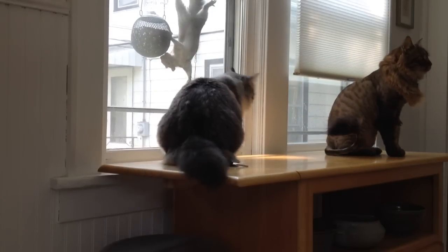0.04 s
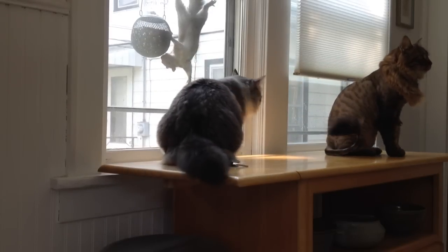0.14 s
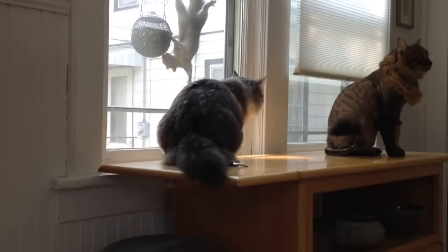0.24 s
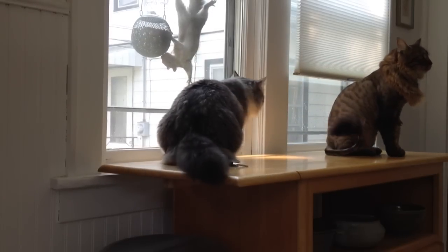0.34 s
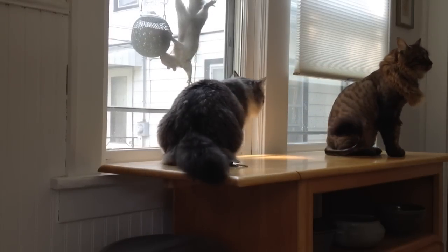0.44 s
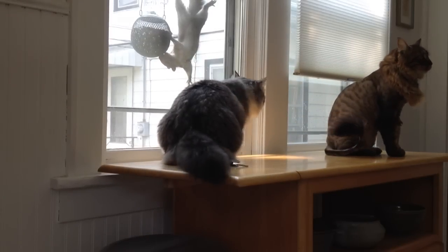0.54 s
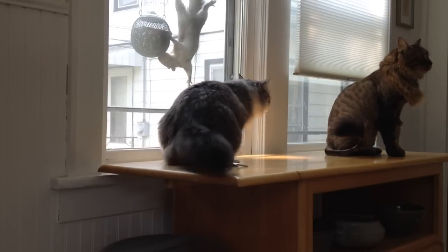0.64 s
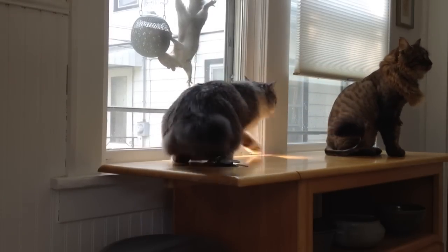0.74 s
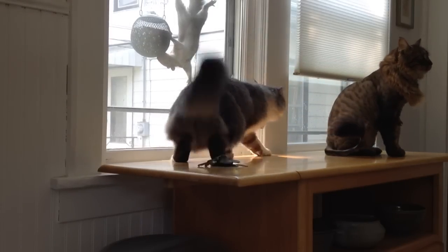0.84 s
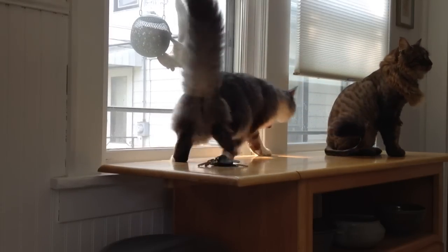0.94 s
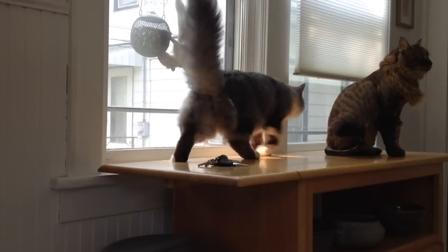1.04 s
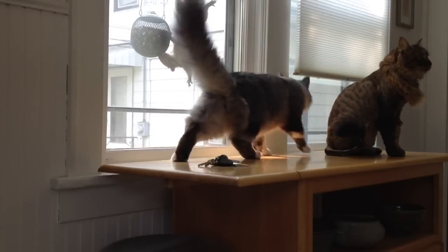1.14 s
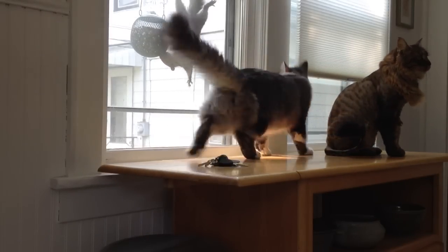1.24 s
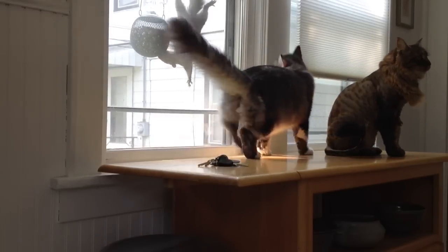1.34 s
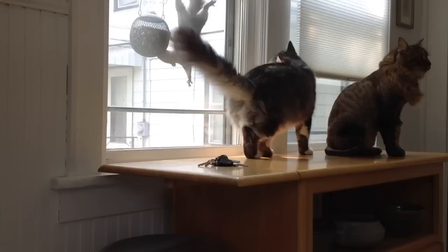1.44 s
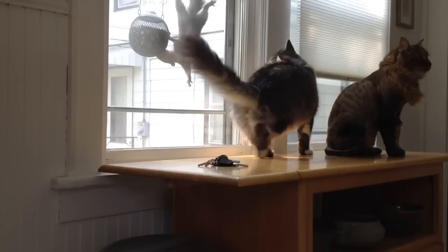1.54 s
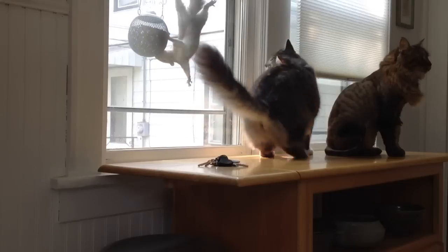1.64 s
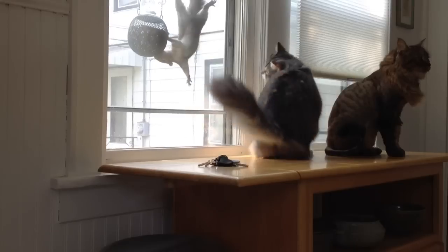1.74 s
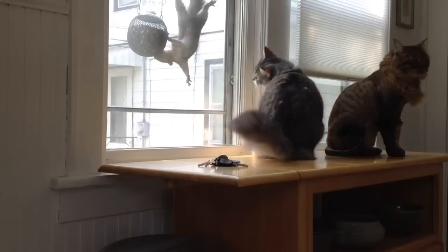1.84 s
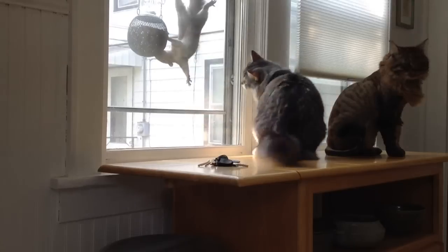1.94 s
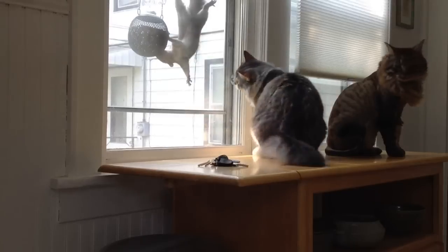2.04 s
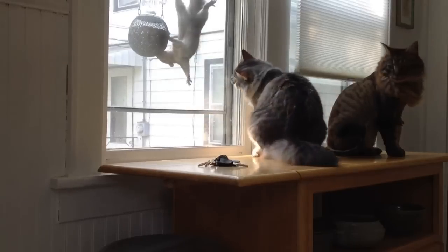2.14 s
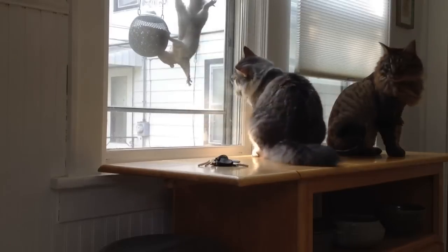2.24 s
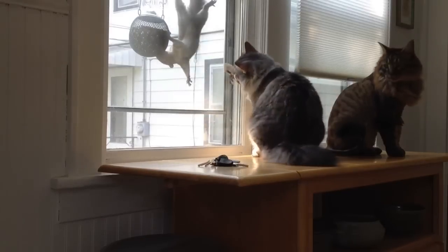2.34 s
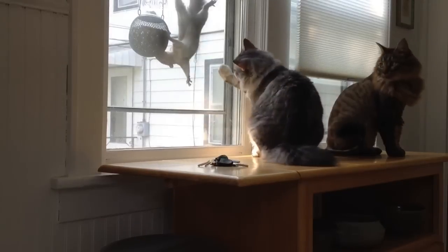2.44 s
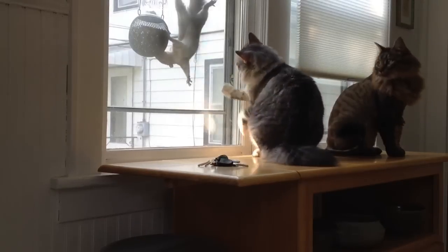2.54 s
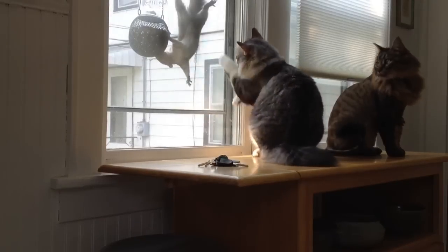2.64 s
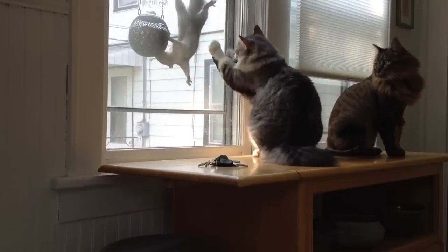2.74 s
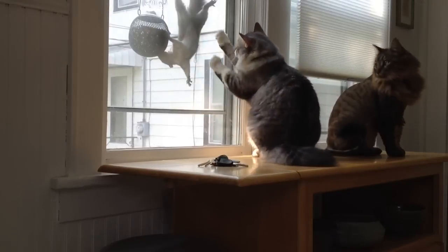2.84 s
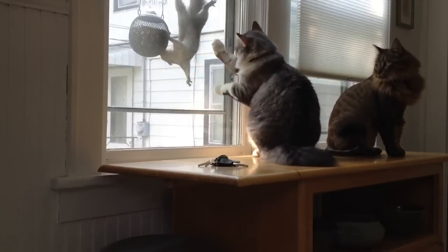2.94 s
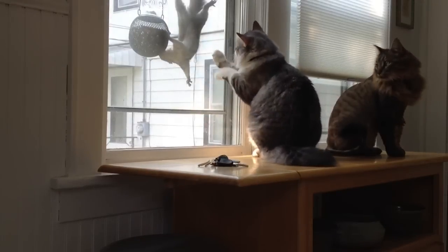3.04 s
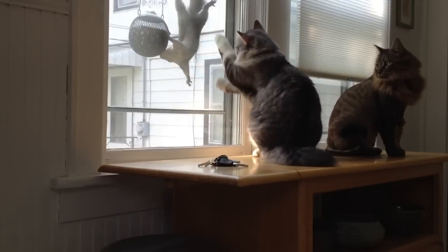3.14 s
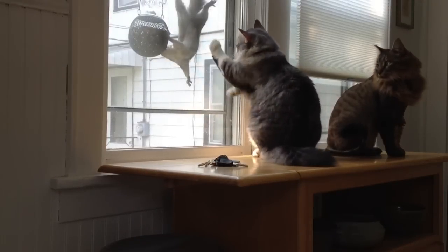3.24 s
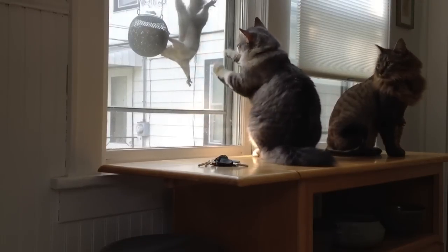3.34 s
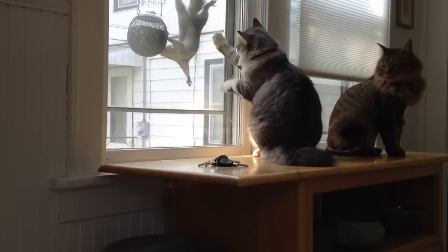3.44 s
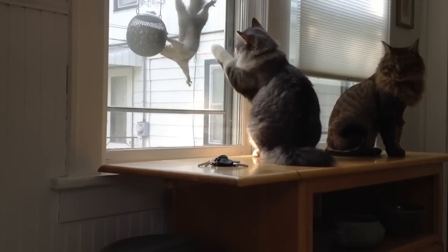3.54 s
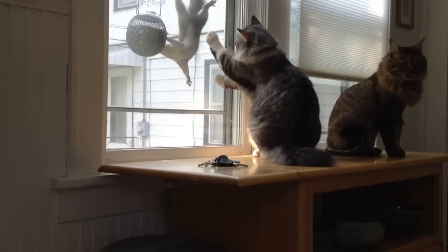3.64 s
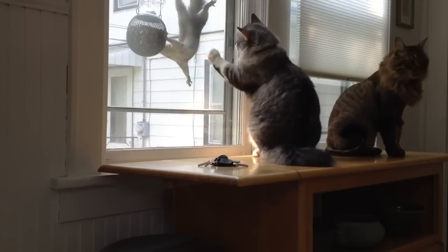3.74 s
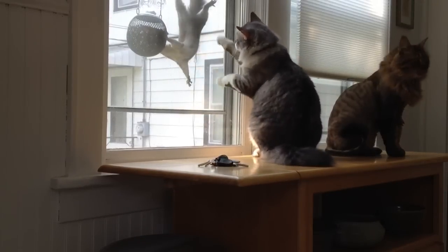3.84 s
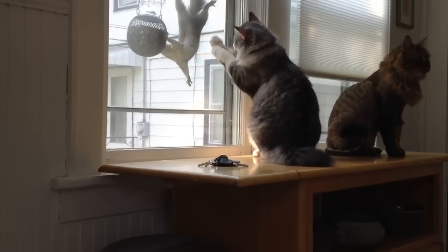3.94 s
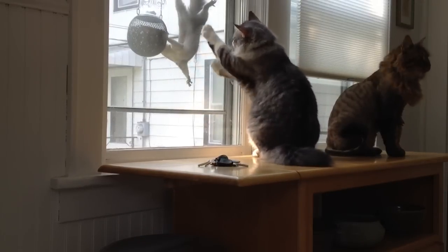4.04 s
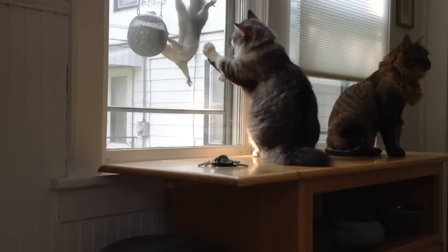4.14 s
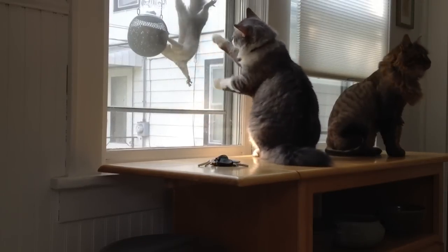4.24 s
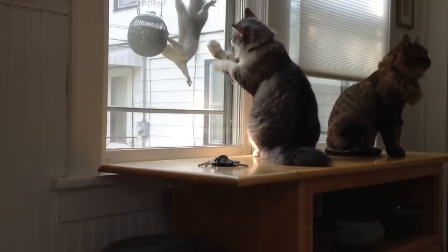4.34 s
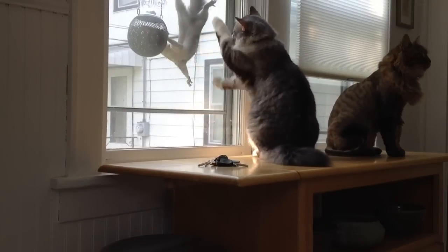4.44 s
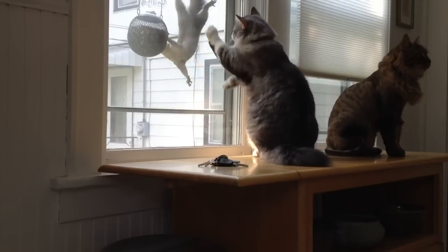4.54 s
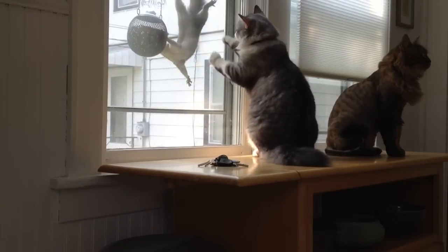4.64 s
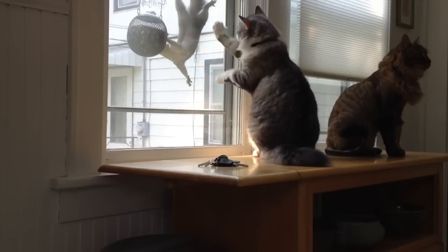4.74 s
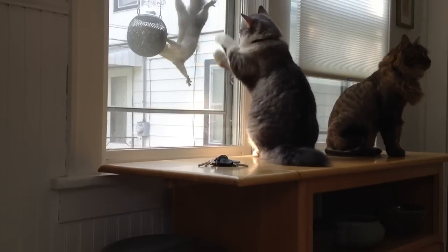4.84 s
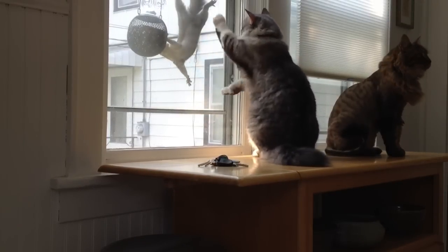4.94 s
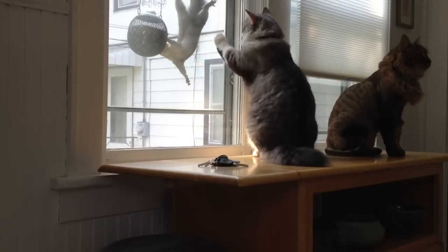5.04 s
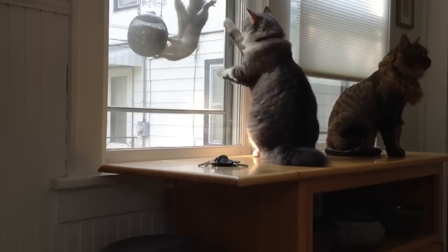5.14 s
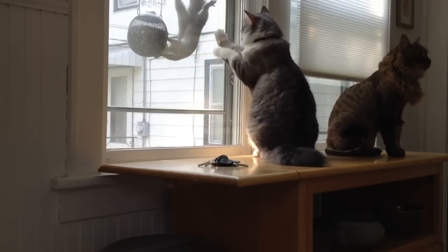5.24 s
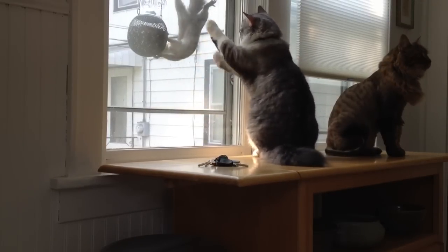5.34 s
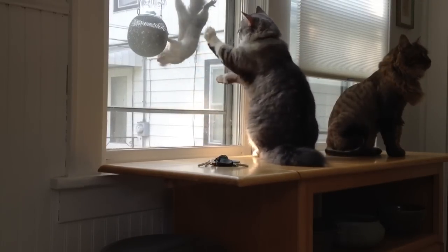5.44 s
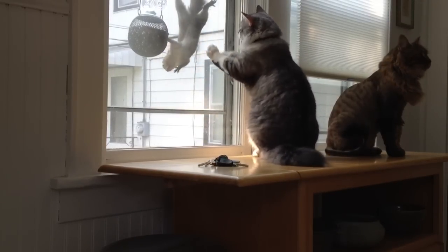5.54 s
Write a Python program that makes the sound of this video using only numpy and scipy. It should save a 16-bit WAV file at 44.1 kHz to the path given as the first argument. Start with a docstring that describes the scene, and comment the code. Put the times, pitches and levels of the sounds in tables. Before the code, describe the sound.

After some soft furry brushing, a cat pats and clicks on window glass in a small, humming room.

```python
"""A cat pats a window pane with its front paws, about four times a second from 2.5 s on.
Each claw ticks on the glass; the pad behind it thumps the pane; a small, live room carries both.
Before that the cat steps across a wooden table, fur brushing. Fur also rubs the sash as it paws.
A refrigerator hums throughout, its motor beating against the mains, over a rush of room air."""
import sys
import numpy as np
from scipy import signal
from scipy.fft import rfft, irfft, next_fast_len
from scipy.io import wavfile

SR = 44100
rng = np.random.default_rng(int(sys.argv[2]) if len(sys.argv) > 2 else 0)


def generate_wav(signal):
    """Clip the signal to [-1, 1] and save it as 16-bit WAV at the path in sys.argv[1]."""
    frames = np.transpose(np.atleast_2d(signal))
    scaled = np.clip(frames, -1, 1) * 32767
    pcm = np.round(scaled).astype(np.int16)
    wavfile.write(sys.argv[1], SR, pcm)


N = 246959
TIME_S = np.arange(N) / SR
AGE_S = np.arange(int(.7 * SR)) / SR  # time within one event
ROOM_T60_S, ROOM_LOW_T60_S = .36, .35
TOP_HZ = 15300

# Pats on the glass. Each row: start in seconds, main claw gain in dB, ping gain re claw in dB,
# pad gain in dB, side claw lag in seconds (negative: it lands first).
PAW_PATS = [(2.5288, -63, 15.5, -77, -0.027), (2.758, -48, 23, -47.5, 0.00065),
            (2.914, -66.5, 17, -73, -0.00075), (3.1581, -65, 20, -71, -0.0025),
            (3.2286, -47, 18.5, -44, -0.0051), (3.3363, -65.5, 17, -67, -0.0035),
            (3.4756, -50, 20, -49, 0.00039), (3.666, -54, 17.5, -57, -0.0098),
            (3.9286, -48, 21.5, -50, 0.0035), (4.0802, -52.5, 11, -49.5, 0.013),
            (4.3267, -47.5, 20, -54.5, 0.0043), (4.5273, -44, 21.5, -42.5, .0066),
            (4.7621, -46.5, 19.5, -53, 0.0033), (4.9031, -58, 15, -62, 0.014),
            (4.9643, -53, 13, -51.5, .0103), (5.2254, -45.5, 24, -55, .002),
            (5.4013, -49.5, 22, -54, -.0081)]
# Modes of the pane in its sash. Each row: frequency in Hz, relative level in dB, T60 in seconds.
PANE_MODES = [(136.3, -11, 0.51), (186.2, -1.5, 0.2), (223, -13, 0.15), (270.6, -4.5, 0.31),
              (343.6, 3, 0.26), (407, 5, 0.074), (466.6, -2.5, 0.07), (573, -7, 0.037), (647, -3, 0.048),
              (790, -8.5, 0.026), (916, -15.5, 0.092), (1160, -17, 0.066), (1366, -5.5, 0.031)]
# Spectra. Each row: frequency in Hz, relative level in dB.
TICK_COLOUR = [(500, -51), (2000, -11), (3000, -10.5), (3800, 1.5), (4600, -4), (5600, -0.5), (7400, 6),
               (9500, -16.5), (11500, -5), (14000, -13), (15500, -31)]  # claw tick, direct
PING_COLOUR = [(4500, -47), (5600, -17), (6300, 0.5), (7000, 2.5), (7700, -1), (8500, -14.5), (10000, -28)]  # its return from the frame
TICK_ROOM_COLOUR = [(400, -32), (1200, -14), (2000, -7), (2900, -4.5), (3700, -2.5), (4700, -5),
                    (5600, -1.5), (6500, 1), (7600, -1.5), (8500, -6), (9700, -16), (12000, -17),
                    (15500, -26)]  # the tick after the walls
GLASS_RING_COLOUR = [(4300, -47), (4650, -2), (4850, -1.5), (5150, -40)]  # glass modes that outlast the tick
FUR_COLOUR = [(500, -25), (1500, -7), (2800, 2), (4400, -1.5), (7500, -1), (10000, -13.5), (12500, -8.5),
              (15500, -11.5)]  # sliding fur
TABLE_COLOUR = [(40, -29), (75, -14), (125, -1), (220, -1), (400, -9), (1000, -33), (4000, -60)]  # bumped table top
# Fur and paws brushing the table. Each row: start in seconds, level in dB, rise in seconds,
# T60 in seconds, tilt in dB per octave.
TABLE_BRUSHES = [(0.0, -69, .04, 1.8, 0), (.14, -61, 0.088, 1.2, 2), (.49, -63, .16, 1.1, 0),
                 (.98, -69, 0.1, 1.6, 1), (1.388, -60.5, 0.01, 0.38, -1), (1.583, -60.5, 0.012, 0.22, -5.5)]
# Footfalls on the table. Each row: start in seconds, level in dB.
FOOTFALLS = [(1.07, -72), (1.123, -55)]
# Compressor lines. Each row: multiple of the shaft speed, rms level in dB.
MOTOR_LINES = [(2, -80), (3, -59.5), (6, -60.5), (8, -73.5), (9, -77), (10, -89), (11, -72.5), (12, -72.5),
               (14, -80.5), (20, -77.5), (32, -87)]
# Air and fan noise. Each row: frequency in Hz, density in dB per Hz.
AIR_COLOUR = [(30, -115), (90, -105), (130, -90.5), (180, -84.5), (240, -89), (360, -85.5), (600, -90),
              (1000, -95), (1600, -97.5), (3000, -107), (5000, -111), (7500, -114), (9800, -122),
              (13000, -117)]
# Microphone port peak and notch. Each row: centre in Hz, width in Hz, gain in dB.
PORT_BANDS = [(4735, 500, 6.5), (4966, 500, -7)]


def pawing(side_claw_db=-7, pad_lag_s=.002, full_blow_db=-48, thinning_per_db=0.02, thin_hz=5500):
    """Two claws and the pad per pat; the lighter a claw lands, the thinner its tick sounds."""
    out = np.zeros(N)
    tip_filter = signal.butter(1, thin_hz, "high", fs=SR)
    for start_s, main_db, ping_db, pad_db, lag_s in PAW_PATS:
        for land_s, claw_db in (start_s, main_db), (start_s + lag_s, main_db + side_claw_db):
            tick = claw(ping_db)
            lightness = np.clip(thinning_per_db * (full_blow_db - claw_db), 0, 1)
            tick = (1 - lightness) * tick + lightness * signal.lfilter(*tip_filter, tick)
            add(out, land_s, undb(claw_db) * tick)
        add(out, start_s + pad_lag_s, undb(pad_db) * pad())
    return out


def claw(ping_db, tick_db=19, near_db=7.5, room_db=5, ring_db=-10, grain_db=4.0):
    """Hard tick, brighter return from the frame, near echoes off sash and table, room, glass ring."""
    tick = undb(tick_db) * bending_wave(TICK_COLOUR, travel_s=0.0013)
    ping = np.sqrt(2) * undb(ping_db) * bending_wave(PING_COLOUR, travel_s=0.0066)
    knots_s = np.arange(0, AGE_S[-1], .001)
    grain = undb(grain_db * np.interp(AGE_S, knots_s, rng.standard_normal(len(knots_s))))
    near = undb(near_db) * burst(TICK_COLOUR, t60_s=0.06) * grain
    room_colour = spot_colour(TICK_ROOM_COLOUR, ripple_db=2.0)
    room = undb(room_db) * burst(room_colour, ROOM_T60_S) * attack(rise_s=0.0038)
    ring = undb(ring_db) * burst(GLASS_RING_COLOUR, t60_s=0.43)
    return tick + ping + near + room + ring


def bending_wave(colour, travel_s):
    """A blow through the glass, peak 1; speed grows as the root of frequency, so highs arrive first."""
    size = 1024
    bins_hz = np.fft.rfftfreq(size, 1 / SR)
    lag_cycles = travel_s * (2 * np.sqrt(TOP_HZ * bins_hz) - bins_hz)
    gain = colour_gain(spot_colour(colour, ripple_db=4.0), bins_hz)
    wave = irfft(gain * np.exp(-2j * np.pi * lag_cycles))[:size // 2]
    return np.pad(wave / np.abs(wave).max(), (0, len(AGE_S) - len(wave)))


def spot_colour(colour, ripple_db):
    """Each spot on the glass favours other modes: a random ripple on the colour."""
    hz = np.linspace(300, TOP_HZ, 60)
    smooth_db = 20 * np.log10(colour_gain(colour, hz))
    return np.column_stack([hz, smooth_db + ripple_db * rng.standard_normal(len(hz))])


def pad(scatter_db=2.5, direct_gain=7.1, low_cut_hz=125, high_cut_hz=1170):
    """The soft pad rings the pane; each spot reweights the modes, and the room swells the thump."""
    spots_db = scatter_db * rng.standard_normal(len(PANE_MODES))
    ring = sum(undb(db + spot_db) * fade(t60_s) * np.cos(2 * np.pi * hz * AGE_S)
               for (hz, db, t60_s), spot_db in zip(PANE_MODES, spots_db))
    room_paths = rng.standard_normal(len(AGE_S)) * (fade(ROOM_LOW_T60_S) + 0.27 * fade(t60_s=0.051))
    room_paths[0] += direct_gain
    thump = signal.fftconvolve(ring, room_paths)[:len(AGE_S)]
    # The thump's lowest bass is cut away; a soft pad excites little treble.
    band = signal.butter(3, [low_cut_hz, high_cut_hz], "band", fs=SR, output="sos")
    thump = signal.sosfilt(band, thump)
    return thump / np.std(thump[AGE_S < .08])


def walking():
    """Fur and paws brush the wood; the cat's weight bumps the table top."""
    out = np.zeros(N)
    for start_s, level_db, rise_s, t60_s, tilt_db_per_octave in TABLE_BRUSHES:
        swell = attack(rise_s) * np.exp(-np.log(1000) * np.maximum(AGE_S - rise_s, 0) / t60_s)
        colour = [(hz, db + tilt_db_per_octave * np.log2(hz)) for hz, db in FUR_COLOUR]
        add(out, start_s, undb(level_db) * swell * unit_rms(noise(colour, len(AGE_S))))
    for start_s, level_db in FOOTFALLS:
        add(out, start_s, undb(level_db) * burst(TABLE_COLOUR, t60_s=.3) * attack(rise_s=0.0068))
    return out


def fur_on_sash(start_s=2.5, rise_s=0.58, level_db=-70.5):
    """Fur rubs the sash: fades in as the cat reaches up, then holds."""
    reach = np.clip((TIME_S - start_s) / rise_s, 0, 1)
    return reach * undb(level_db) * unit_rms(noise(FUR_COLOUR, N))


def refrigerator(shaft_hz=58.836, mains_hz=59.98, mains_db=-60.5, waver_db=2.5):
    """The motor slips behind the mains and hunts slowly; their sixth multiples beat at about 7 Hz."""
    hunt_hz, hunt_period_s, fastest_s = .075, 2.65, 2.04
    phase_delay_s = .047
    speed_hz = shaft_hz + hunt_hz * np.cos(2 * np.pi * (TIME_S - fastest_s) / hunt_period_s)
    turns = np.cumsum(speed_hz) / SR - shaft_hz * phase_delay_s
    motor = sum(undb(db + waver_db * drift(rate_hz=3.076)) * np.sin(2 * np.pi * multiple * turns)
                for multiple, db in MOTOR_LINES)
    mains = undb(mains_db) * np.sin(2 * np.pi * 6 * mains_hz * (TIME_S - phase_delay_s))
    return np.sqrt(2) * (motor + mains)


def room_air(waver_db=1.5):
    """Air and fan rush, wavering slightly in level."""
    return noise(AIR_COLOUR, N) * undb(waver_db * drift(rate_hz=6.2))


def undb(db):
    """Decibels to gain."""
    return 10 ** (np.asarray(db) / 20)


def unit_rms(x):
    """Scale to rms 1."""
    return x / np.sqrt(np.mean(x ** 2))


def attack(rise_s):
    """Linear rise to 1, then hold."""
    return np.minimum(AGE_S / rise_s, 1)


def fade(t60_s):
    """Exponential decay over one event."""
    return np.exp(-np.log(1000) * AGE_S / t60_s)


def colour_gain(colour, bins_hz):
    """Gain of (Hz, dB) points, interpolated over log frequency."""
    hz, db = np.transpose(colour)
    return undb(np.interp(np.log(np.maximum(bins_hz, 1)), np.log(hz), db))


def noise(colour, size):
    """Noise whose density follows (Hz, dB per Hz) points."""
    fft_size = next_fast_len(size)
    white = rfft(rng.standard_normal(fft_size))
    gain = colour_gain(colour, np.fft.rfftfreq(fft_size, 1 / SR))
    return irfft(white * gain, fft_size)[:size] * np.sqrt(SR / 2)


def burst(colour, t60_s):
    """Coloured noise decaying from rms 1."""
    return unit_rms(noise(colour, len(AGE_S))) * fade(t60_s)


def drift(rate_hz):
    """Slow random curve, spread near 1."""
    knots = rng.standard_normal(int(TIME_S[-1] * rate_hz) + 2)
    return np.interp(TIME_S * rate_hz, np.arange(len(knots)), knots)


def add(track, start_s, sound):
    """Mix a sound into the track."""
    first = max(int(start_s * SR), 0)
    track[first:first + len(sound)] += sound[:N - first]


def scene():
    """The cat over the room's hum, mono."""
    return (pawing() + walking() + fur_on_sash() + refrigerator() + room_air())[None]


def record(dry):
    """The microphone port colours the treble; the top is cut steeply."""
    for hz, width_hz, db in PORT_BANDS:
        band = signal.lfilter(*signal.iirpeak(hz, hz / width_hz, fs=SR), dry)
        dry = dry + (undb(db) - 1) * band
    return signal.sosfilt(signal.ellip(10, .2, 70, TOP_HZ, fs=SR, output="sos"), dry)


dry = scene()
out = record(dry)
generate_wav(out)
```